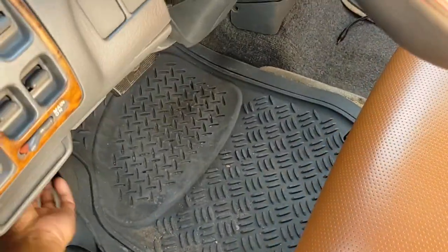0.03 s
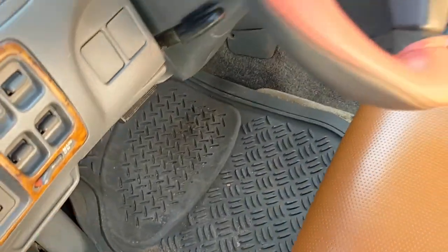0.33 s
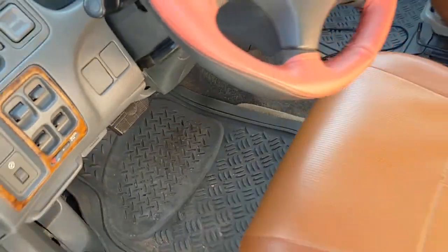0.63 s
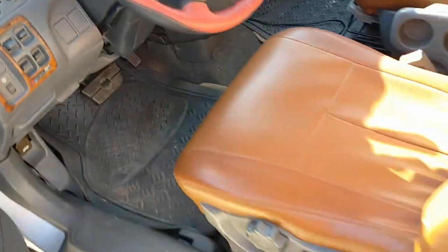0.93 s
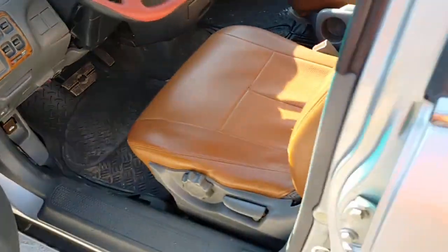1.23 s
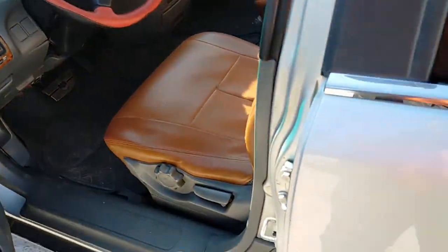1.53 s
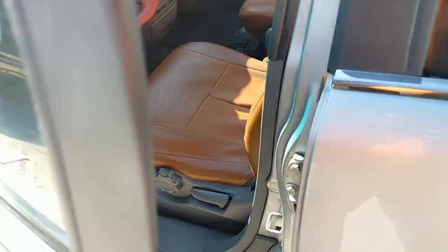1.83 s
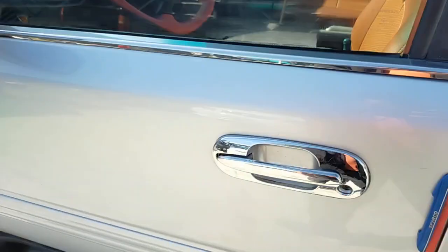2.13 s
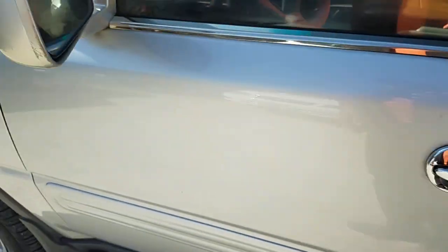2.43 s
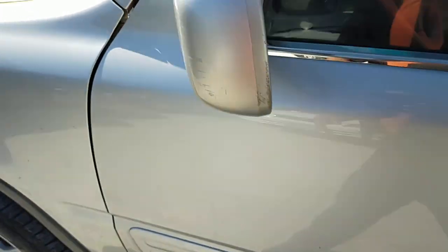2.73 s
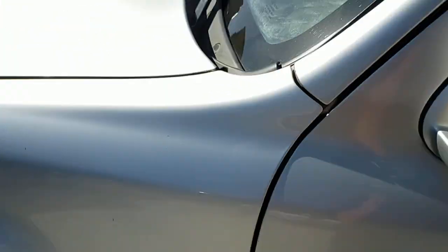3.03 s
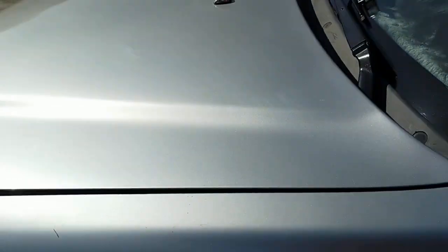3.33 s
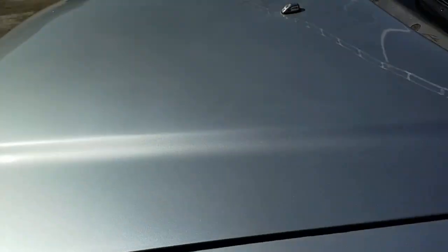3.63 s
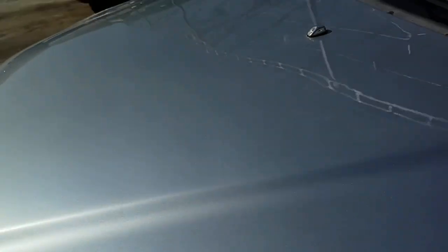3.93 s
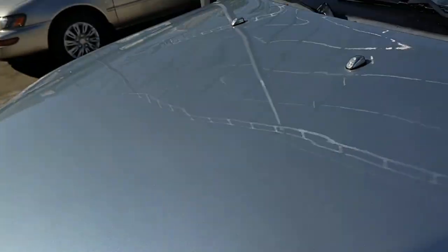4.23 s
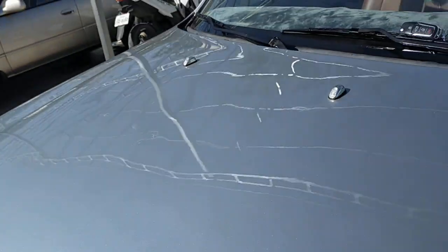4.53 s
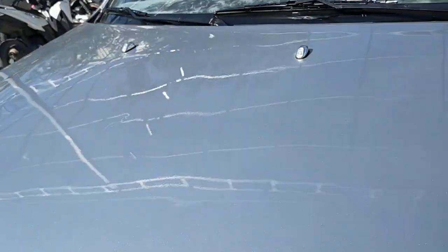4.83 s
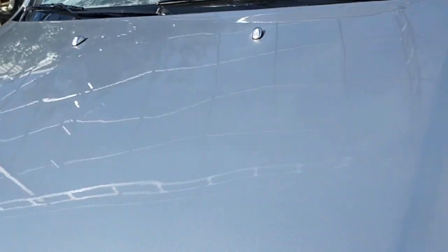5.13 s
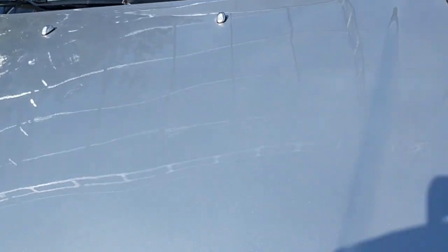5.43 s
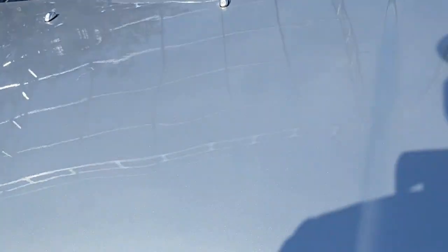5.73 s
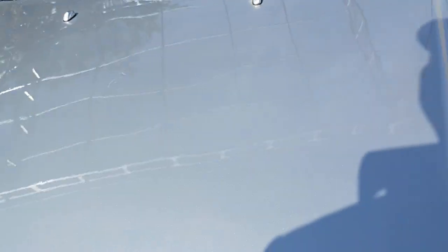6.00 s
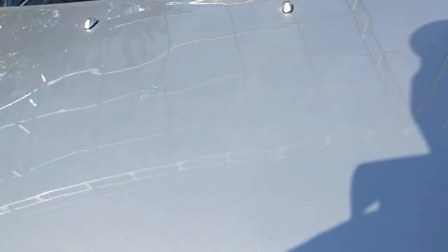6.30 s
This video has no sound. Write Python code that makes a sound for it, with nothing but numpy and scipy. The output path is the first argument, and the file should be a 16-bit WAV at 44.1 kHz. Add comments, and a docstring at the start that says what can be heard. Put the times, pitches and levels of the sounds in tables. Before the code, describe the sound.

Inside a parked car, a plastic release lever is pulled close to the microphone and snaps back as the bonnet pops with a dull thump. The microphone moves outdoors and the door is shut firmly. Faint clothing swishes, ticks and soft bumps follow, then the bonnet knocks and clacks on its metal catch. A low rumble and faint hum lie behind, and a hiss with thin whistles grows toward the front.

```python
"""A parked car outdoors, one microphone carried close. In the cabin the bonnet release lever is pulled
and snaps back, and the bonnet pops up with a thump. We step out, and the driver's door is swung shut.
Clothing swishes on the walk to the front, where the bonnet knocks on its safety catch twice.
Behind it all lie a low rumble, a faint hum and a hiss with thin, slowly sinking whistles;
the hiss grows towards the front of the car."""
import sys
import numpy as np
from scipy import signal
from scipy.fft import rfft, irfft
from scipy.io import wavfile
from scipy.ndimage import uniform_filter1d

SR = 44100
rng = np.random.default_rng(int(sys.argv[2]) if len(sys.argv) > 2 else 0)


def int16_out(signal):
    """Quantize to a 16-bit WAV file."""
    q = np.round(np.clip(np.atleast_2d(signal).T, -1, 1) * 32767)
    wavfile.write(sys.argv[1], SR, q.astype(np.int16))


N = 285018
BLOW_TIME = np.arange(int(0.6 * SR)) / SR   # seconds since a contact

# Spectra of the door panel and its latch, which also colour the bumps and ticks around the car.
# Each row: frequency in Hz, relative density in dB.
PANEL_COLOUR = [(15, -29), (25, 0.5), (66, -10.5), (123, -16), (200, -17.5), (300, -18.5), (363, -21.5),
                (575, -20.5), (734, -28), (936, -25), (1190, -23.5), (2840, -29.5), (5430, -41),
                (7110, -42), (8590, -88), (16000, -21)]
LATCH_COLOUR = [(600, -26), (1500, 1.5), (3000, 6.5), (4500, -5), (6000, -1), (7500, 5.5), (9500, -39),
                (12500, -9), (16000, 12.5)]


def door():
    """The door at arm's length: the seal touches, the latch snaps over the striker, panel and cabin boom."""
    # Contacts. Each row: start in seconds, relative level in dB, cut-off in Hz.
    panel_hits, latch_hits = [(2.178, -24, 800), (2.1965, -16.5, 12100), (2.217, -21.5, 1100),
                              (2.231, -31, 4500), (2.282, -24.5, 301), (2.309, -34.5, 1800),
                              (2.354, -39.5, 600)], [(2.194, -28, 15000), (2.202, -43, 12000),
                                                 (2.2155, -29, 15000), (2.256, -26.5, 9400)]
    # Ring times. Each row: frequency in Hz, t60 in seconds.
    panel_ring, latch_ring = [(40, 0.69), (200, 0.58), (500, 0.28), (1200, 0.27), (3000, 0.3),
                              (12000, 0.14)], [(1000, 0.038), (14000, 0.033)]
    # Clear modes. Each row: frequency in Hz, relative level in dB, t60 in seconds.
    panel_modes, latch_modes = [(23.6, 6, 0.29), (60.5, -10, 0.68), (102, 0.5, 0.15), (155, -5, 0.35),
                                (207, -2.5, 0.3), (239, -4.5, 0.27), (282, -10, 0.4), (433, -12, 0.29),
                                (515, -2, 0.15), (577, -2, 0.126), (723, -12, 0.14), (1055, -10, 0.18),
                                (867, 6.5, 0.031)], [(3060, -14.5, .09), (4350, -10, .07), (7400, -5.5, .05)]
    panel = struck(panel_hits, PANEL_COLOUR, panel_ring, panel_modes,
                   crowd_db=-4.5, modes_db=-8.5, crack_db=-2, crack_t60=0.018)
    latch = struck(latch_hits, LATCH_COLOUR, latch_ring, latch_modes, crowd_db=-9, modes_db=-6)
    return panel + latch


def bonnet():
    """The sheet metal thumps as it pops up; later, close by, a hook clicks free and the catch clacks."""
    # Contacts. Each row: start in seconds, relative level in dB, cut-off in Hz.
    sheet_hits, hook_hits, catch_hits = [(.080, -36.5, 395), (.110, -22.5, 91), (5.254, -31.5, 1500),
                                         (5.2785, -19, 12000), (5.400, -40, 200), (6.442, -33, 400)], [(5.2505, -34.5, 14930),
                                                              (5.2529, -25.5, 15000)], [(5.4378, -24, 13000),
                                                                                 (5.441, -24, 9000),
                                                                                 (5.449, -25, 12000),
                                                                                 (5.4585, -23, 11060),
                                                                                 (5.465, -26.5, 3600)]
    # Spectra. Each row: frequency in Hz, relative density in dB.
    sheet_colour = [(21, -43), (35, -1.5), (150, -6), (286, -5.5), (360, 2), (466, -10), (884, -7.5),
                    (1090, -13), (1770, -12), (2010, -11), (2590, -18), (3440, -19), (4440, -36),
                    (7230, -15.5), (9100, -69.5), (16000, -15.5)]
    hook_colour = [(250, -8), (600, -1), (1200, -6), (2000, -4), (3600, -4.5), (5200, -15), (7000, -7),
                   (9000, -47), (12000, -15), (16000, -18)]
    catch_colour = [(35, -38), (60, -14), (90, 2), (130, -6.5), (193, -15), (515, -4), (968, -19),
                    (1170, -8), (1410, -9), (1780, -8.5), (2710, -8.5), (3940, -18), (7060, -19.5),
                    (8920, -64), (11500, -26), (16000, -16)]
    # Ring times. Each row: frequency in Hz, t60 in seconds.
    sheet_ring, hook_ring, catch_ring = [(50, 0.37), (150, 0.77), (450, 0.33), (1100, 0.171), (3000, 0.16),
                                         (12000, 0.08)], [(500, 0.36), (2500, 0.25), (6000, 0.036),
                                                              (14000, 0.11)], [(90, 0.44), (500, 0.31),
                                                                                 (1100, 0.2), (2500, 0.13),
                                                                                 (6000, 0.08),
                                                                                 (14000, 0.085)]
    # Clear modes. Each row: frequency in Hz, relative level in dB, t60 in seconds.
    sheet_modes, hook_modes, catch_modes = [(45.5, 9, 0.025), (151, -13, 0.4), (208.6, -8.5, 0.17),
                                            (251, -9.5, 0.19), (342, -3, 0.15), (363.7, -12.5, 0.25),
                                            (519, -17.5, 0.3), (1070, -1.5, 0.063), (1420, -13, 0.14),
                                            (2060, -13, 0.12), (3429, -27.5, 0.22)], [(6530, -4, 0.054), (6980, 0.5, 0.055)], [(88, -9, 0.3),
                                                                                      (523.6, -7.5, 0.2),
                                                                                      (978, -8, 0.092),
                                                                                      (1450, -14, 0.11),
                                                                                      (1870, -6.5, 0.075),
                                                                                      (2040, -8, 0.073),
                                                                                      (2460, -8, 0.094),
                                                                                      (2620, -9, 0.11),
                                                                                      (2790, -9, 0.11),
                                                                                      (3000, -16, .14),
                                                                                      (3220, -18, .14),
                                                                                      (5270, -11, 0.061),
                                                                                      (6955, -19, 0.06)]
    hook = struck(hook_hits, hook_colour, hook_ring, hook_modes,
                  crowd_db=-2, modes_db=-0.5, crack_db=-24, crack_t60=0.037)
    sheet = struck(sheet_hits, sheet_colour, sheet_ring, sheet_modes, crowd_db=-3.5, modes_db=1.5)
    catch = struck(catch_hits, catch_colour, catch_ring, catch_modes, crowd_db=-2.5, modes_db=0.5)
    return hook + sheet + catch


def lever():
    """Close up in the cabin, the plastic release lever is pulled and snaps back."""
    hits = [(.079, -37, 9900), (.083, -42, 12800), (.089, -40.5, 7100), (.097, -38, 7500),
            (.2165, -43, 12000), (.230, -43, 5000), (.2566, -27, 13600), (.259, -21, 5670)]   # Each row: start in seconds, relative level in dB, cut-off in Hz.
    colour = [(150, -43), (250, -29.5), (350, -25), (468, 9), (748, -1), (816, 10.5), (1500, -14),
              (1880, 5.5), (2440, 2.5), (3580, 0.5), (5540, -22), (5930, -6), (7570, -1), (9170, -26),
              (16000, -3.5)]   # Each row: frequency in Hz, relative density in dB.
    ring = [(500, 0.16), (1000, 0.093), (2500, 0.12), (6000, 0.1), (14000, 0.12)]   # Each row: frequency in Hz, t60 in seconds.
    modes = [(491, 2.5, 0.1), (1870, -13, 0.064), (2010, 4.5, 0.056), (2630, -2, 0.1), (2800, 2, 0.03),
             (3850, -3, 0.093)]   # Each row: frequency in Hz, relative level in dB, t60 in seconds.
    return struck(hits, colour, ring, modes, crowd_db=-1, modes_db=-5.5, crack_db=-1, crack_t60=0.029)


def handling():
    """Faint hollow taps, the early ones soft clicks of the release lever in the cabin, then thin ticks and dull
    bumps of someone moving around the car."""
    # Contacts. Each row: start in seconds, relative level in dB, cut-off in Hz.
    tap_hits, tick_hits, bump_hits = [(.047, -51.5, 2200), (1.338, -59, 9230), (1.347, -63, 9300),
                                      (1.431, -50, 1400), (5.403, -57, 9000), (6.437, -51, 3000),
                                      (6.445, -45, 5000)], [(2.997, -50.5, 9000), (3.016, -55, 8000),
                                                           (3.516, -53, 12000), (3.566, -51, 8000),
                                                           (4.086, -57, 11750), (4.768, -55, 15000),
                                                           (4.801, -42, 2500), (4.895, -51, 15100)], [(.360, -41.5, 203),
                                                                               (2.570, -34.5, 110),
                                                                               (3.050, -34.5, 90),
                                                                               (4.080, -35, 110),
                                                                               (4.690, -28, 133.2),
                                                                               (4.785, -29, 126),
                                                                               (4.900, -31.5, 110)]
    # Ring times. Each row: frequency in Hz, t60 in seconds.
    tap_ring, tick_ring, bump_ring = [(500, 0.11), (3000, 0.053)], [(1000, 0.038), (14000, 0.015)], [(40, 0.28), (300, 0.051)]
    tap_colour = [(350, -6.5), (550, 0.5), (850, -3.5), (1200, -2.5), (1700, -5), (3000, -11), (6000, -12),
                  (16000, -53)]   # Each row: frequency in Hz, relative density in dB.
    tap_modes = [(570, 0, 0.099), (797, -1, 0.033), (1186, 0, 0.12)]   # Each row: frequency in Hz, relative level in dB, t60 in seconds.
    taps = struck(tap_hits, tap_colour, tap_ring, tap_modes, crowd_db=9.5, modes_db=6)
    ticks = struck(tick_hits, LATCH_COLOUR, tick_ring, crowd_db=7)
    bumps = struck(bump_hits, PANEL_COLOUR, bump_ring, crowd_db=-1.5)
    return taps + ticks + bumps


def clothing():
    """Cloth slides over cloth near the microphone: a high, grainy swish that swells and stops."""
    swishes = [(2.865, 0.21, -54), (3.194, 0.36, -48), (4.81, .1, -40)]   # Each row: start and length in seconds, relative level in dB.
    colour = [(6000, -23), (9500, -29), (11000, -5), (12200, 5), (13300, 2.5), (15500, -0.5)]   # Each row: frequency in Hz, relative density in dB.
    sliding = sum(from_db(level_db) * held(start_s, start_s + length_s, attack_s=0.14, release_s=0.043)
                  for start_s, length_s, level_db in swishes)
    return sliding * wander(per_s=150, depth_db=1) * coloured(colour)


def hiss():
    """A hiss, muffled in the cabin and behind the open door, louder and richer towards the front."""
    # Spectra from afar and from close by. Each row: frequency in Hz, relative density in dB.
    far_colour, near_colour = [(350, -14), (600, -76), (823, -14.5), (1370, -21.5), (1800, -16), (1960, -9),
                               (3300, -12), (3580, -14), (4520, -17), (5400, -24), (7210, -18),
                               (8620, -29.5), (12500, -23), (16000, -29)], [(350, -3), (600, -12), (812, -7.5), (1570, -10.5),
                                                 (1730, -6), (1900, -1.5), (2400, 1.5), (3000, 4),
                                                 (3390, 0), (3680, -0.5), (4110, 0), (4340, -8.5),
                                                 (5000, -6), (5950, -15.5), (7410, -6.5), (9600, -21.5),
                                                 (13900, -14.5), (16000, -21)]
    # A broad peak swells and moves up. Each row: time in seconds, centre in Hz, dB against the hiss.
    peak_path = [(4.3, 1950, -38), (4.6, 2000, -11), (4.87, 2127, -2), (5.2, 2223, -5.5), (5.6, 2950, -6.5),
                 (5.85, 3463, -4), (6.1, 3050, -16), (6.46, 3075, -23)]
    # Loudness along the walk. Each row: time in seconds, gain in dB.
    gain_path = [(.5, -55.3), (.8, -51), (1.2, -52), (1.42, -53.5), (1.58, -51.7), (2.0, -51.7),
                 (2.45, -49), (2.73, -51), (2.92, -48.3), (3.65, -48), (3.85, -46.3), (4.35, -46.5),
                 (4.65, -44.5), (5.8, -42.6), (6.4, -43)]
    centre_hz, peak_db = in_time(peak_path)
    gain_db, = in_time(gain_path)
    nearness = np.clip(0.22 + 1.1 * ramp(start_s=2.1, end_s=6.94), 0, 1)
    air = np.sqrt(1 - nearness) * coloured(far_colour) + np.sqrt(nearness) * coloured(near_colour)
    air *= wander(per_s=13, depth_db=0.5)
    peak = from_db(peak_db) * wavering_tone(centre_hz, width_hz=530)
    return from_db(gain_db) * (air + peak + whistles())


def whistles():
    """Thin whistles in the hiss sink together, each swelling and fading; a very high one comes and goes."""
    pitch_path = [(1.2, 1885), (2.45, 1843), (3.05, 1818), (3.7, 1795), (4.3, 1770), (4.95, 1752),
                  (5.4, 1712), (5.8, 1722), (6.1, 1710), (6.46, 1716)]   # Each row: time in seconds, lowest whistle's pitch in Hz.
    partials = [(1, 12.9), (1.715, 85), (1.99, 17), (2.367, 8.8), (2.59, 11.5)]   # Each row: pitch ratio to the lowest whistle, width in Hz.
    # Swells. Each row: time in seconds, then dB against the hiss for each whistle, lowest first.
    level_path = [(2.2, -28, -30, -26, -26, -20), (2.48, -7, -18, -20, -22, -23),
                  (2.68, -16, -20, -20, -24, -16), (2.85, -6.5, -20, -20, -22, -17),
                  (3.05, -7, -20, -20, -22, -19), (3.35, -17, -20, -20, -22, -19),
                  (3.8, -4.5, -20, -19.5, -17, -21), (4.08, -9, -18, -15, -16, -24),
                  (4.35, -7.5, -17, -11, -14, -15), (4.62, 0, -12, -13, -17, -22),
                  (4.8, -9, -14, -12, -17, -22), (5.05, -6, -13, -6, -12, -16),
                  (5.6, -15, -10, -11.5, -18, -20), (6.0, -11, -10, -6, -9, -18),
                  (6.25, -16, -8, -14, -5, -26)]
    top_spells = [(3.72, 4.0, -20), (4.8, 5.42, -23), (5.8, 6.249, -25)]   # Each row: start and end in seconds, dB against the hiss.
    lowest_hz, = in_time(pitch_path)
    chord = 0
    for (ratio, width_hz), level_db in zip(partials, in_time(level_path)):
        gain = from_db(level_db) * wander(per_s=14, depth_db=2.4)
        line = whine(ratio * lowest_hz, width_hz)
        rough_skirt = from_db(-6.5) * whine(ratio * lowest_hz, width_hz=111.14)
        chord += gain * (line + rough_skirt)
    top_gain = sum(from_db(level_db) * held(start_s, end_s, attack_s=0.11, release_s=0.11)
                   for start_s, end_s, level_db in top_spells)
    return chord + top_gain * wavering_tone(hz=11300, width_hz=140)


def hum():
    """A faint, unsteady hum comes in as the microphone leaves the cabin and swells once on the walk."""
    swell = np.exp(-((np.arange(N) / SR - 4.3) / 0.28) ** 2)
    outside = ramp(start_s=0.44, end_s=1)
    return from_db(-58.5 + 11 * swell) * outside * wavering_tone(hz=147, width_hz=24)


def rumble():
    """Low outdoor rumble, stronger while air moves past the microphone."""
    colour = [(12, -26), (20, -0.5), (38, -1), (108, -6.5), (144, -20), (210, -17.5), (270, -16),
              (400, -22.5), (1400, -22), (1820, -19), (3080, -120)]   # Each row: frequency in Hz, relative density in dB.
    # The microphone is carried briskly. Each row: start and end in seconds.
    brisk_moves = [(.75, 2.08), (2.85, 4.73)]
    moving = sum(held(start_s, end_s, attack_s=0.14, release_s=0.14) for start_s, end_s in brisk_moves)
    return from_db(-51.5 + 2 * moving) * wander(per_s=8.3, depth_db=-1.5) * coloured(colour)


def struck(hits, colour, ring, modes=(), crowd_db=0, modes_db=0, crack_db=-6, crack_t60=0.045):
    """Each contact rings a crowd of modes and the clear ones anew: dull if soft, bright if hard."""
    track = np.zeros(N + len(BLOW_TIME))
    blows = from_db(crowd_db) * crowded_modes(len(hits), colour, ring, crack_db, crack_t60)
    for hz, mode_db, t60 in modes:
        strengths = from_db(modes_db + mode_db + rng.normal(size=len(hits)))
        signs = rng.choice([-1, 1], len(hits))
        blows += np.outer(strengths * signs, np.sin(2 * np.pi * hz * BLOW_TIME) * dying(t60))
    for (start_s, level_db, cut_hz), blow in zip(hits, blows):
        contact = signal.butter(2, cut_hz, fs=SR, output="sos")
        start = int(start_s * SR)
        track[start:start + len(blow)] += from_db(level_db) * signal.sosfilt(contact, blow)
    return track[:N]


def crowded_modes(count, colour, ring, crack_db, crack_t60):
    """One row per blow: countless close modes crack at once, then each band dies at its own pace."""
    edges_hz = np.geomspace(25, 17000, 23)
    size, spacing, attack_size = len(BLOW_TIME), SR // 8, int(0.02 * SR)
    crack = from_db(crack_db) * dying(crack_t60)
    blows = 0
    for low, high in zip(edges_hz, edges_hz[1:]):
        hz = np.sqrt(low * high)
        band = signal.butter(2, [low, high], "band", fs=SR, output="sos")
        noise = signal.sosfilt(band, rng.standard_normal(size + count * spacing))
        modes = np.array([noise[k * spacing:][:size] for k in range(1, count + 1)])
        rise = 1 - np.exp(-2 * np.pi * hz * BLOW_TIME)   # low modes take longer to swing out
        burst = modes * rise * (dying(at_hz(ring, hz)) + crack)
        bass_loss = min(1, hz / colour[0][0]) ** 2   # a small part radiates no bass
        gain = np.sqrt(high - low) * from_db(at_hz(colour, hz)) * bass_loss
        blows += gain * burst / burst.std(axis=1, keepdims=True)
    return blows / blows[:, :attack_size].std()


def coloured(spectrum):
    """Steady noise with a given spectrum, falling steeply beyond its ends; rms 1."""
    hz = np.maximum(np.fft.rfftfreq(N, 1 / SR), 1)
    low_hz, high_hz = spectrum[0][0], 2 * spectrum[-1][0]
    skirts = 1 / (1 + (low_hz / hz) ** 4) / (1 + (hz / high_hz) ** 4)
    white = rfft(rng.standard_normal(N))
    return rms_one(irfft(white * from_db(at_hz(spectrum, hz)) * skirts, N))


def wavering_tone(hz, width_hz):
    """Noise in a narrow resonance whose centre may move; rms 1."""
    lowpass = signal.butter(2, width_hz / 2, fs=SR, output="sos")
    slow = signal.sosfilt(lowpass, rng.standard_normal((2, N)))
    phase = 2 * np.pi * np.cumsum(hz * np.ones(N)) / SR
    return rms_one(slow[0] * np.cos(phase) + slow[1] * np.sin(phase))


def whine(hz, width_hz):
    """A tone of even strength whose pitch jitters about a moving centre; rms 1."""
    jitter = rng.standard_normal(N) * np.sqrt(2 * np.pi * width_hz / SR)
    phase = np.cumsum(2 * np.pi * hz / SR + uniform_filter1d(jitter, size=200))
    return np.sqrt(2) * np.sin(phase)


def wander(per_s, depth_db):
    """A gain that drifts to a new random value per_s times a second."""
    turns = np.arange(N) / SR * per_s
    steps = rng.standard_normal(2048)
    return from_db(depth_db * np.interp(turns, np.arange(len(steps)), steps))


def dying(t60):
    """An envelope that falls 60 dB in t60 seconds."""
    return np.exp(-np.log(1000) * BLOW_TIME / t60) + 1e-18


def ramp(start_s, end_s):
    """Rises evenly from 0 to 1 between two moments."""
    return np.clip((np.arange(N) / SR - start_s) / (end_s - start_s), 0, 1)


def held(start_s, end_s, attack_s, release_s):
    """Attack, hold and release between two moments."""
    return ramp(start_s, start_s + attack_s) * (1 - ramp(end_s - release_s, end_s))


def in_time(rows):
    """Each column of a curve at every sample."""
    seconds, *columns = np.transpose(rows)
    return [np.interp(np.arange(N) / SR, seconds, column) for column in columns]


def at_hz(points, hz):
    """Read a table on a log-frequency axis."""
    freqs, values = np.transpose(points)
    return np.interp(np.log(hz), np.log(freqs), values)


def from_db(db):
    """Decibels to gain."""
    return 10 ** (np.asarray(db) / 20)


def rms_one(x):
    """Scale to an rms of 1."""
    return x / np.sqrt(np.mean(x ** 2) + 1e-20)


def scene():
    """All sources at one microphone, carried from the cabin to the front of the car."""
    return (lever() + door() + bonnet() + handling() + hiss() + hum() + rumble() + clothing())[None]


def record(dry):
    """The recorder rounds the peaks and cuts the top above 16.1 kHz."""
    top_cut = signal.ellip(10, 0.1, 70, 16100, fs=SR, output="sos")
    return signal.sosfilt(top_cut, 0.82 * np.tanh(dry / 0.61))


dry = scene()
out = record(dry)
int16_out(out)
```